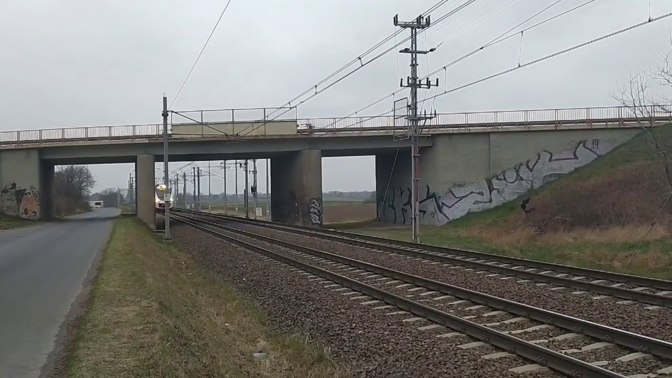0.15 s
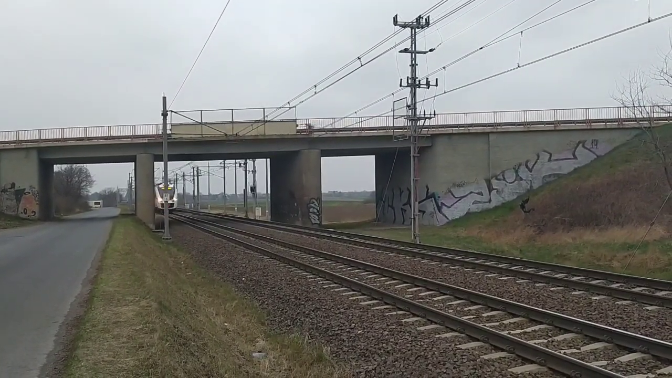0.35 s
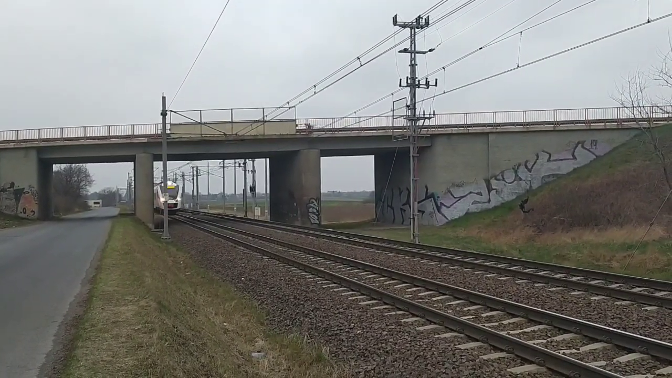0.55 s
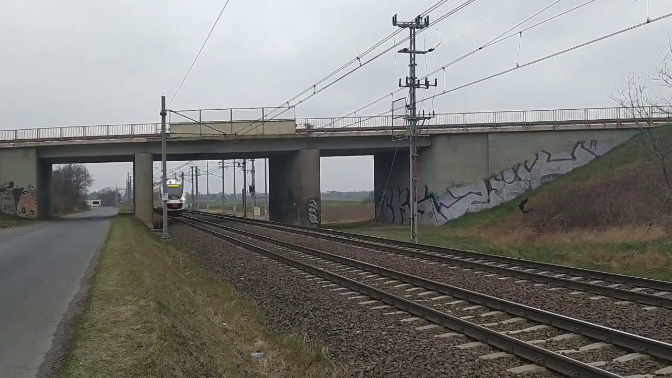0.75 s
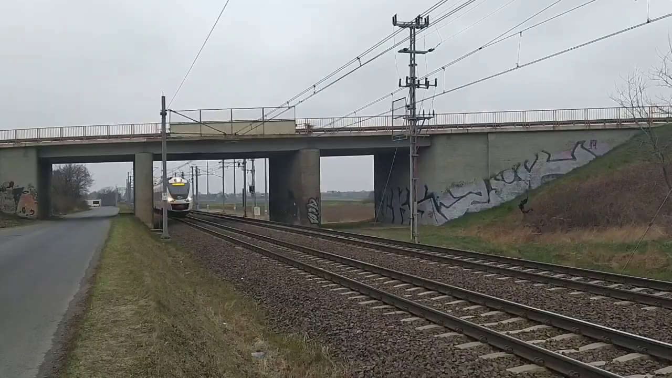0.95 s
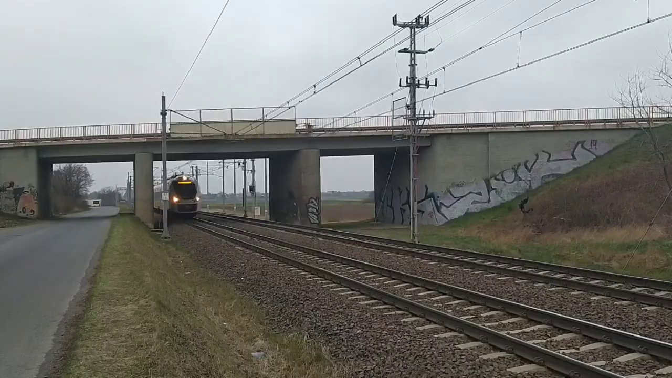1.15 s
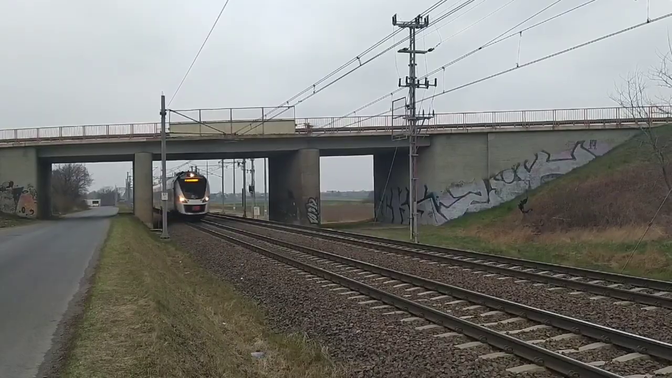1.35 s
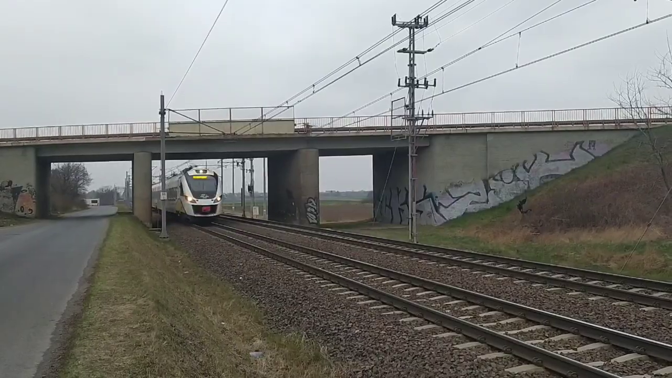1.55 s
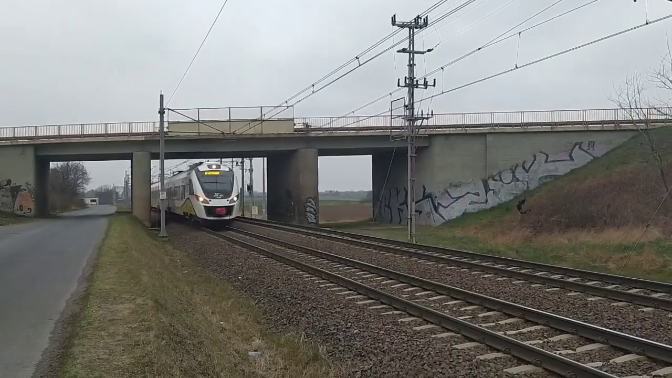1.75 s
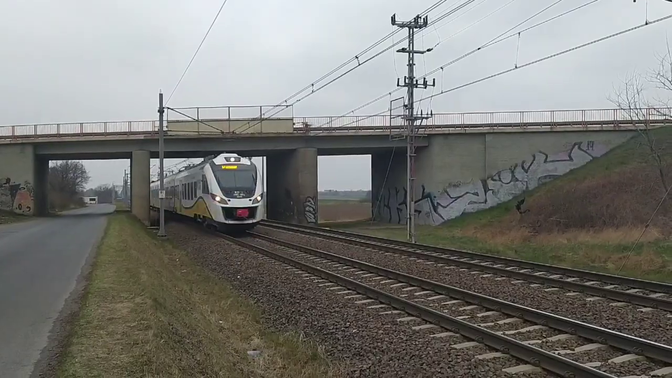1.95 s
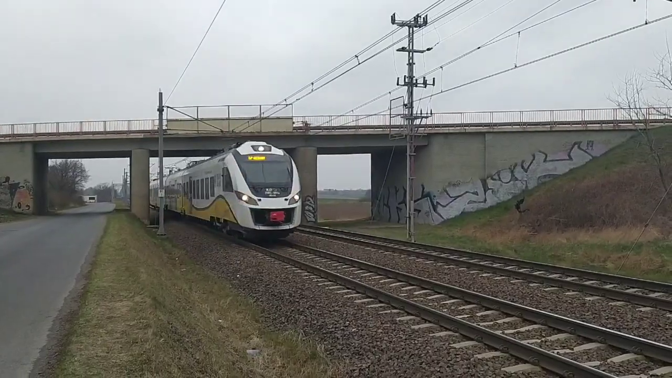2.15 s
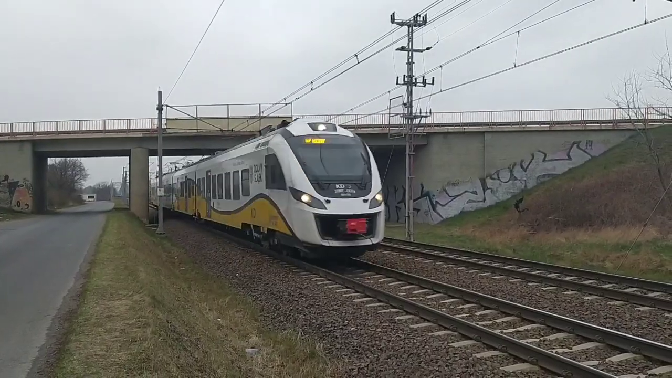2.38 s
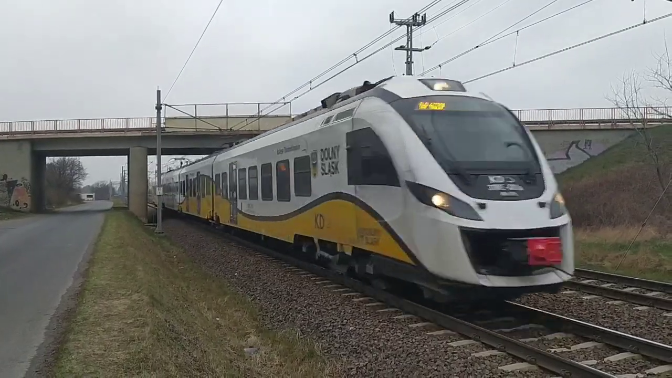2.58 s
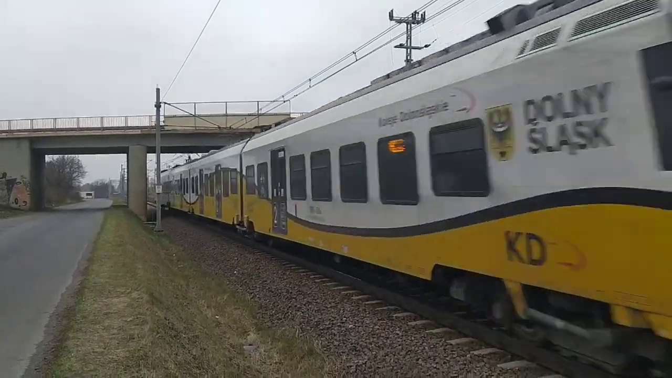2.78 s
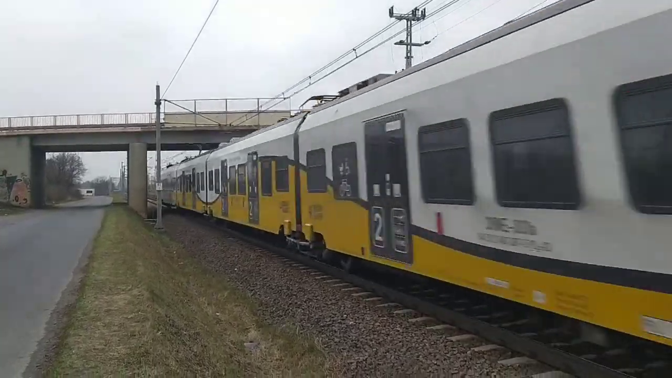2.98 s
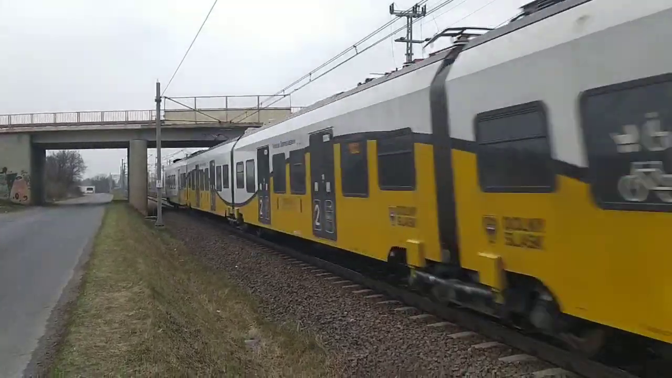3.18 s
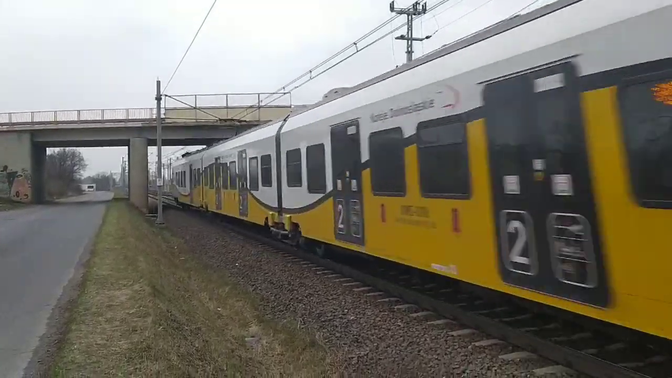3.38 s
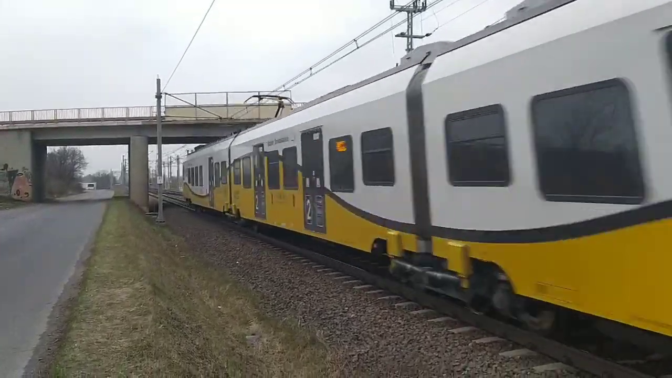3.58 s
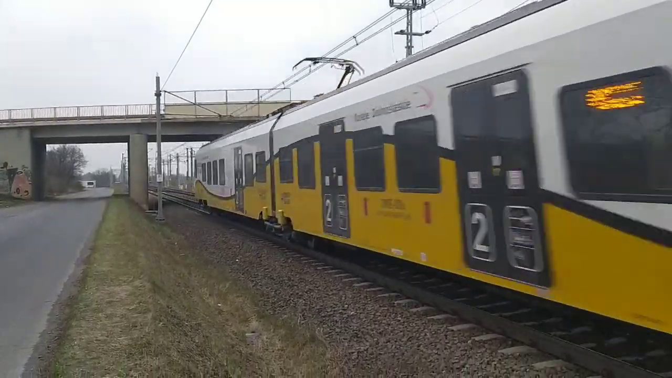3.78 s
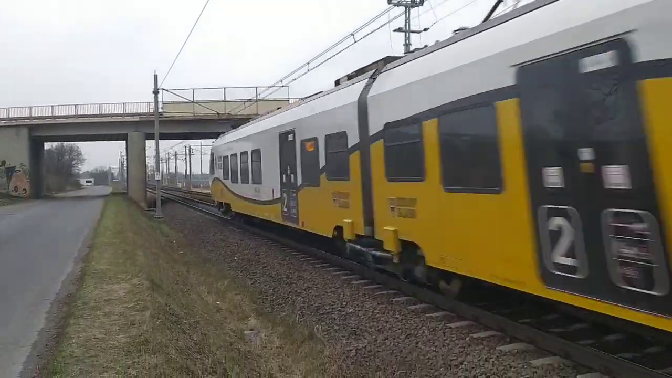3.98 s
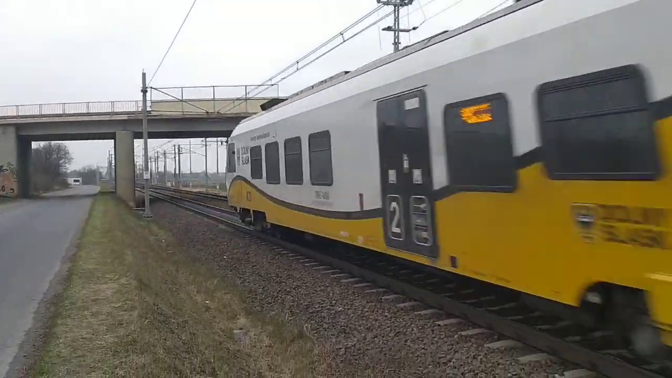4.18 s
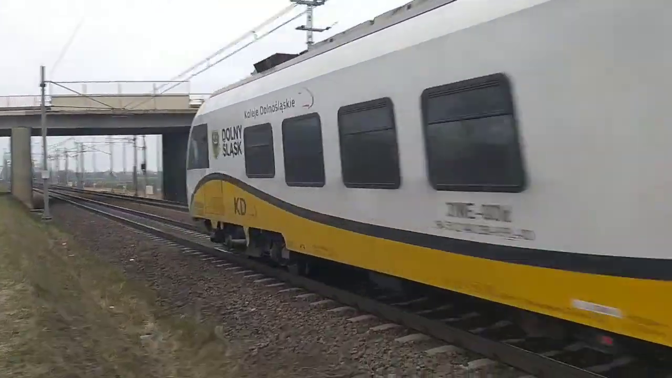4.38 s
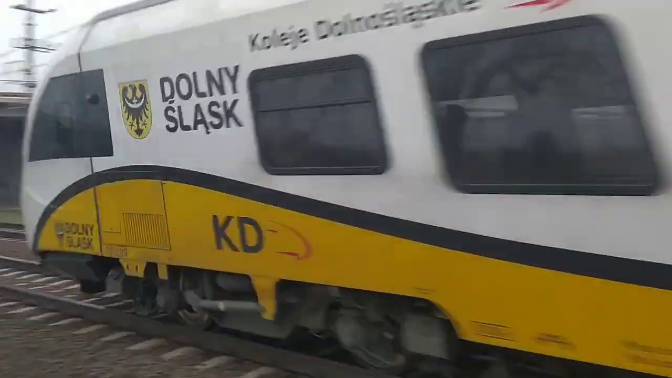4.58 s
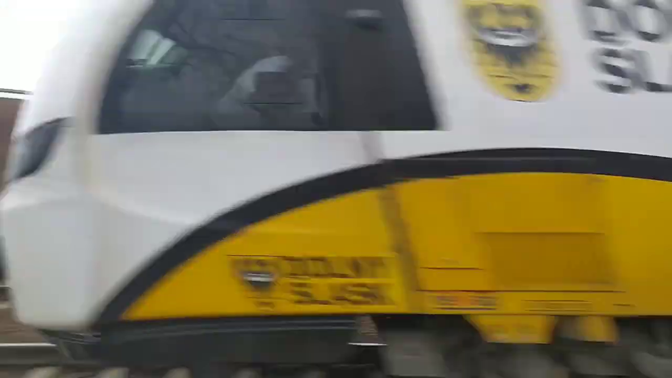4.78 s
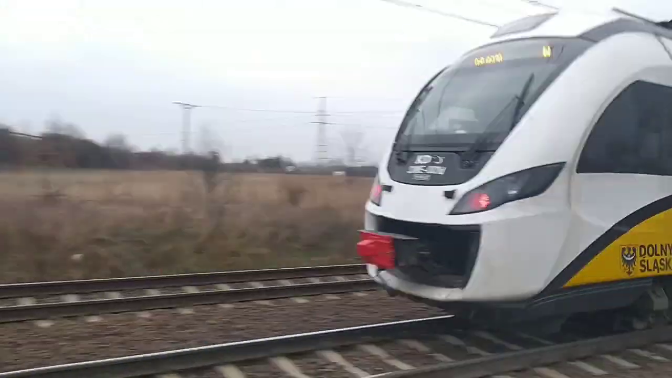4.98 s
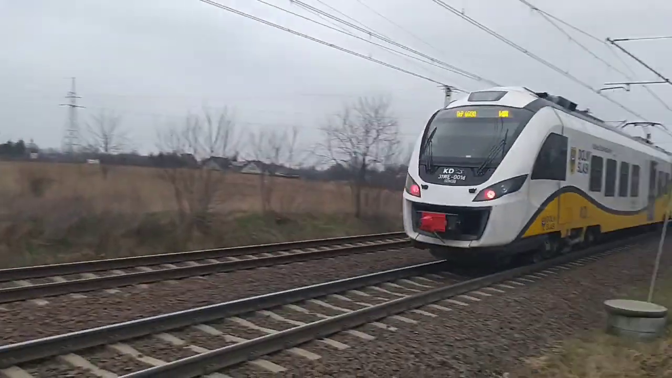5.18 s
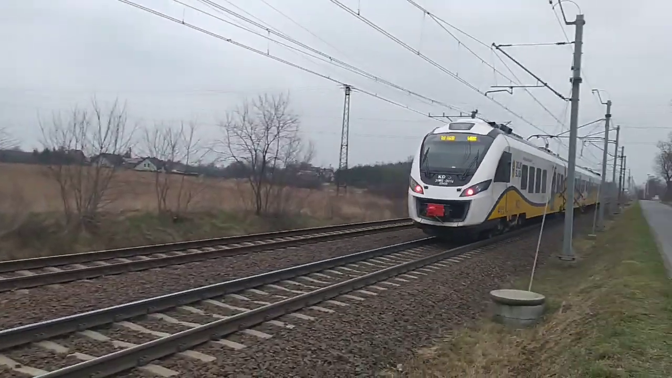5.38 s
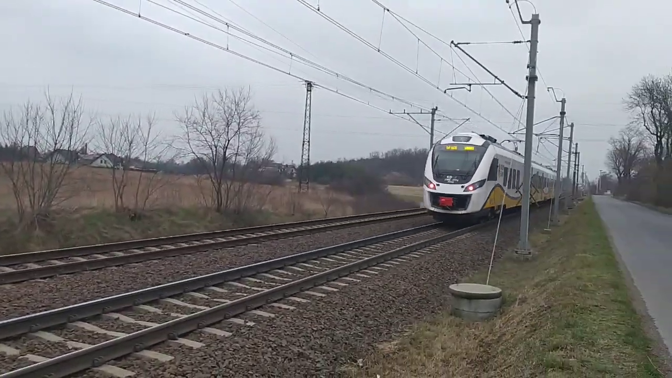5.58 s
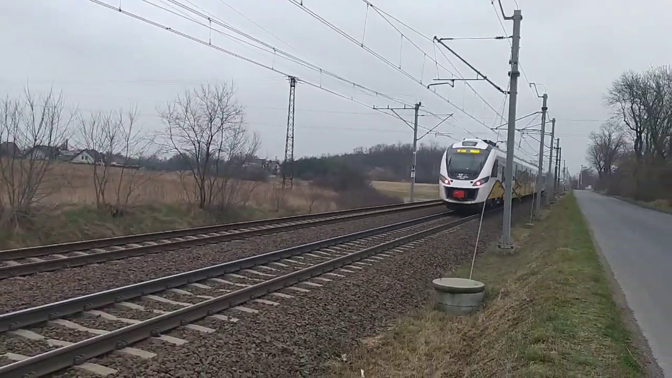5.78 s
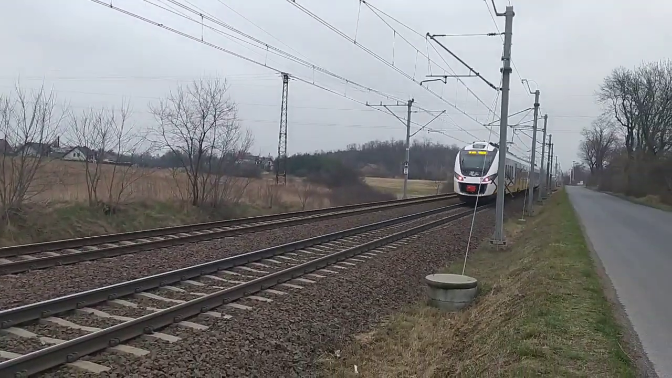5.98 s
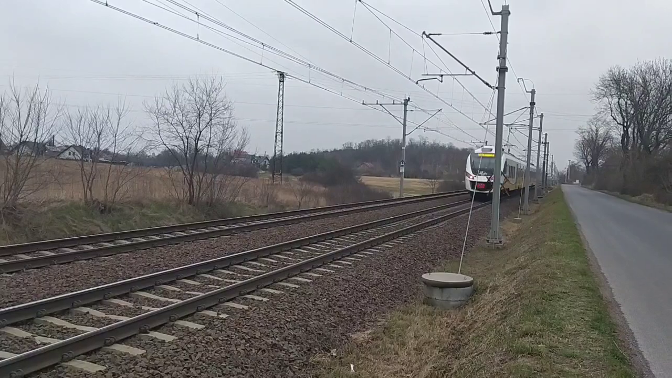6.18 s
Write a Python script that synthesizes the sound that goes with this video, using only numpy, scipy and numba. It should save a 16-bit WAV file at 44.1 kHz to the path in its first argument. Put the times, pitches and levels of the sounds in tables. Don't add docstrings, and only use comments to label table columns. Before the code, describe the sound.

A handheld stereo phone close to the track catches a fast electric multiple unit. Thin metallic singing and a soft hiss build, then a broad rush of wheels and air with uneven thumps and a few hard ticks. The last wheels pass with a bright ringing surge, pitch sinks, and the sound fades beneath blunt wind buffeting and dull rattling cracks.

```python
import sys
import numpy as np
from scipy import signal
from scipy.fft import rfft, irfft, dct
from scipy.io import wavfile
from scipy.ndimage import uniform_filter1d
from numba import njit

SR = 44100
rng = np.random.default_rng(int(sys.argv[2]) if len(sys.argv) > 2 else 0)


def output_pcm(signal):
    pcm = np.clip(np.atleast_2d(signal).T, -1, 1) * 32767
    wavfile.write(sys.argv[1], SR, np.round(pcm).astype(np.int16))


def gain_from_db(level_db):
    decades = np.asarray(level_db, float) / 20
    return 10 ** decades


N = 275434
TIME = np.arange(N) / SR
FREQ = np.fft.rfftfreq(N, 1 / SR) + 1
SPEED_M_S = 33


def unit(x):
    return x / np.sqrt(np.mean(x ** 2))


def curves(table):
    s, *columns = np.transpose(table)
    return [np.interp(TIME, s, c) for c in columns]


def bump(s, length):
    return np.exp(-((TIME - s) / length) ** 2)


def walk(rate):
    k = int(SR / rate)
    held = np.repeat(rng.standard_normal(N // k + 1), k)
    slewed = uniform_filter1d(uniform_filter1d(held, k), k)
    return unit(slewed[:N])


@njit
def svf(x, hz, width):
    y, b, l = np.empty(len(x)), 0., 0.
    for i in range(len(x)):
        g, k = np.tan(np.pi * hz[i] / SR), width / hz[i]
        v = (b + g * (x[i] - l)) / (1 + g * (g + k))
        b, l, y[i] = 2 * v - b, l + 2 * g * v, k * v
    return y


def gusts(table, trim_db):
    out, age = np.zeros(N + 4000), np.arange(4000) / SR
    for (s, db, hz), noise in zip(table, rng.standard_normal((len(table), 2, 4000))):
        length = 0.014 * (200 / hz) ** 0.46
        rise = np.sin(np.pi / 2 * np.clip(age / 0.0073, 0, 1)) ** 2
        shape = rise * np.exp(-(age / length) ** 2)
        wobble = unit(uniform_filter1d(noise[0], size=150))
        glide = hz * (.85 + .4 * np.exp(-age / .008)) * gain_from_db(2.5 * wobble)
        flap = np.sin(2 * np.pi * np.cumsum(glide) / SR)
        swirl_hz = np.full(4000, 1.63 * hz)
        swirl = unit(svf(svf(noise[1], swirl_hz, 1.5 * hz), swirl_hz, 1.9 * hz))
        out[int((s - .003) * SR):][:4000] += gain_from_db(db + trim_db) * shape * (flap + 0.37 * swirl)
    return out[:N]


def rattles():
    # time in seconds, peak in dB, brightness in Hz.
    cracks = [
        (5.909, -24, 696),
        (5.971, -10, 830),
        (5.989, -6, 775),
        (6.0008, -6, 2110),
        (6.017, -15, 1500),
        (6.05, -23, 890),
        (6.129, -34, 804),
        (6.195, -15, 700),
        (6.235, -11, 790),
    ]
    out, age = np.zeros(N + 800), np.arange(800) / SR
    for (s, db, hz), noise in zip(cracks, rng.standard_normal((len(cracks), 800))):
        burst = noise * age * np.exp(-age / 0.0024 * (hz / 900) ** 0.36)
        burst[88] -= 3.9 * abs(burst).max() * (hz / 1900) ** 2
        centre_hz, width_hz = np.full(800, 1. * hz), 0.64 * hz * (hz / 900) ** 0.5
        crack = svf(svf(burst, centre_hz, width_hz), centre_hz, width_hz)
        out[int((s - .002) * SR):][:800] += gain_from_db(db) * crack / abs(crack).max()
    return out[:N]


def wind():
    # time in seconds, peak in dB, pitch in Hz.
    left_gusts = [(.355, -20, 61), (.385, -26, 140), (.568, -29, 90), (1.015, -29, 50), (5.748, -18, 71.6),
                  (5.788, -12, 164), (6.03, -21, 198), (6.067, -5, 250), (6.084, -9, 197), (6.1, -9, 120),
                  (6.115, -13, 129), (6.163, -12, 170), (6.18, -26, 59.6)]
    # time in seconds, peak in dB, pitch in Hz.
    right_gusts = [(0.03, -28.5, 189), (0.083, -31, 169), (0.637, -20.5, 160), (0.929, -28, 190),
                   (1.119, -29, 198), (1.139, -24.5, 168), (1.179, -23, 165), (1.339, -22, 240),
                   (2.15, -24, 245), (5.599, -13, 188), (5.633, -7, 199), (5.654, -15, 168),
                   (5.688, -19, 178), (5.908, -6.5, 310), (5.924, -15, 226), (5.968, -1.5, 316),
                   (5.98, -7, 272), (5.998, -5.5, 309), (6.016, -8, 505), (6.028, -9.5, 366),
                   (6.038, -17, 410), (6.049, -9, 533), (6.061, -21, 190), (6.114, -13, 180),
                   (6.128, -8, 393), (6.144, -12, 240), (6.193, -4, 250), (6.216, -7, 163),
                   (6.226, -6.5, 204), (6.239, -4, 297)]
    left = gusts(left_gusts, trim_db=-3.5)
    right = gusts(right_gusts, trim_db=1.5) + rattles()
    return np.array([left, right])


def clicks():
    # time in seconds, peak in dB, left minus right in dB.
    ticks = [
        (2.3994, -24, 2),
        (2.83, -12, 6),
        (2.865, -10, 12),
        (2.931, -7, 8),
        (3.0036, -17, 9),
        (3.0694, -12, -18),
        (3.105, -19, 5),
        (3.1767, -30, -12),
        (3.264, -51, -5),
        (3.399, -15, -8),
    ]
    out, age = np.zeros((2, N + 800)), np.arange(800) / SR
    centre_hz = np.full(800, 2000.)
    for (s, db, pan_db), noise in zip(ticks, rng.standard_normal((len(ticks), 800))):
        strike = noise * age * np.exp(-age / 0.0023)
        tick = svf(svf(strike, centre_hz, 2200.0), centre_hz, 2200.0)
        sides_db = np.array([[pan_db], [-pan_db]]) / 2
        out[:, int(s * SR):][:, :800] += tick / abs(tick).max() * gain_from_db(db - 4.0 + sides_db)
    return out[:, :N]


def thumps():
    # time in seconds, swell in dB, length in seconds.
    strikes = [(2.4, 2.5, 0.011), (2.52, -2, 0.013), (2.596, 3, 0.031), (2.665, 3.5, 0.012),
               (2.73, 2, 0.037), (2.797, 2, 0.028), (2.813, 0, 0.016), (2.966, 4, 0.014),
               (3.002, 2.5, 0.01), (3.029, 4.5, 0.021), (3.079, 4, 0.028), (3.11, 6, 0.019),
               (3.146, 5, 0.032), (3.186, 4.5, 0.02), (3.237, 2.5, 0.019), (3.264, 4.5, 0.015),
               (3.302, 1, 0.026), (3.314, 1, 0.021), (3.35, 0.5, 0.0093), (3.402, 1, 0.036),
               (3.87, 1, 0.03), (4.247, 0.5, 0.023), (4.334, 1.5, 0.035), (4.463, 0, 0.022),
               (4.764, -1.5, 0.021), (4.879, 1.5, 0.022), (4.978, 1, 0.0097), (5.12, 0.5, .015),
               (5.163, 2, 0.023)]
    swell = np.zeros(N)
    for s, db, length in strikes:
        here = slice(int(s * SR) - 400, int(s * SR) + 3600)
        age = np.clip(TIME[here] - s + 0.0084, 0, 1) / length
        swell[here] += db * 5 * age * np.exp(1 - 5 * age + 2.45 * np.minimum(age, 1))
    return swell


def ringing(hz, width_hz):
    return unit(svf(svf(rng.standard_normal(N), hz, width_hz), hz, width_hz))


def rings(table, width_hz):
    distance_m, sound_m_s = 16, 343
    out = 0
    for passes, hz, loudest, db, length in table:
        along = SPEED_M_S * (TIME - passes)
        heard_hz = hz / (1 + SPEED_M_S / sound_m_s * along / np.hypot(along, distance_m))
        out = out + gain_from_db(db) * bump(loudest, length) * ringing(heard_hz, width_hz)
    return out


def rail_rings():
    # passes in seconds, pitch at rest in Hz, loudest in seconds, share in dB, length in seconds.
    songs = [
        (2.7, 1010, 2.14, -4, 0.61),
        (2.71, 993, 2.8, -1.5, 0.18),
        (4.705, 1017, 4.677, 5.5, 0.22),
        (4.66, 1040, 5.15, 0, 0.39),
        (3.9, 1200, 4.72, -4, 0.17),
    ]
    return gain_from_db(np.array([[2.1], [-2.6]])) * rings(songs, width_hz=106.0)


def rim_rings():
    # passes in seconds, pitch at rest in Hz, loudest in seconds, share in dB, length in seconds.
    songs = [
        (2.9, 1820, 2.2, -8, 0.51),
        (2.9, 2000, 3.14, -3, 0.15),
        (4.4, 2265, 4.7, -3.5, 0.34),
        (4.3, 2020, 4.94, -1, 0.089),
        (3.4, 2200, 3.42, -6, 0.056),
    ]
    return gain_from_db(np.array([[-.6], [.6]])) * rings(songs, width_hz=260.0)


def roughness(grain_db, per_s, share):
    size_db = grain_db * np.minimum(rng.exponential(size=(2, N)), 3)
    falls = rng.random((2, N)) < per_s / SR
    grains = falls * gain_from_db(size_db) * rng.standard_normal((2, N))
    return rfft(rng.standard_normal((2, N)) + share * unit(grains))


def ports(colour, excite):
    hz, *columns = np.transpose(colour)
    left_db, right_db, like = (np.interp(np.log(FREQ), np.log(hz), c) for c in columns)
    like = np.clip(like, -.98, .98)
    mid, side = np.sqrt(1 + like) * excite[0], np.sqrt(1 - like) * excite[1]
    return np.array([gain_from_db(left_db) * (mid + side), gain_from_db(right_db) * (mid - side)])


def part(spectra, index):
    edges_hz = (0, 130, 600, 1500, 3650, 22050)
    lo, hi = edges_hz[index], edges_hz[index + 1]
    shape = 1 / np.sqrt((1 + (lo / FREQ) ** 16) * (1 + (FREQ / hi) ** 16))
    both = irfft(spectra * shape, N)
    return both / np.sqrt(np.mean(both.mean(axis=0) ** 2))


def views():
    # time in seconds, where the train is (0 far, 1 coming, 2 alongside, 3 leaving).
    place = [
        (0, 0),
        (.6, 0.32),
        (1.3, 1),
        (2.2, 1.16),
        (2.7, 2),
        (4.8, 2),
        (5.12, 3),
        (6.25, 3),
    ]
    # pitch in Hz, left port in dB, right port in dB, likeness of the ports from -1 to 1.
    roll_far = [(30.2, 0.5, -3, 0.72), (140, -18, -12.5, 0.88), (214, -7.5, -12.5, 0.91),
                (340, -17.5, -24.5, 0.83), (574, -28, -28, 0.69), (795, -10, -15.5, 0.74),
                (1100, -5.5, -16, 0.6), (1220, -31, -6, 0.25), (1390, -9.5, -18, -0.89),
                (1610, -26.5, -25.5, -0.94), (2000, -27, -19.5, 0.015), (2410, -25, -32, 0.1),
                (3140, -36, -33.5, 0.54), (3596, -43, -43, -0.69)]
    roll_coming = [(33, -9.5, -11.5, 0.89), (120, -19.5, -30.5, 0.98), (180, -1, -2.5, 0.72),
                   (254, -6.5, -9.5, 0.98), (384, -10.5, -19.5, 0.11), (576, -20.5, -17, 0.56),
                   (792, 4.5, -1.5, 0.6), (1105, 5, -1.5, 0.41), (1422, -13.5, -11.5, -0.42),
                   (1686, -13.5, -19, -1.3), (1935, -16.5, -12.5, 0.54), (2650, -20.5, -21, -0.2),
                   (3210, -20, -19.5, 0.79), (3720, -51.5, -54, 0.53)]
    roll_beside = [(33.6, -11, -16.5, 1), (120, -18.5, -19.5, 0.75), (180, -0.5, -5, 0.97),
                   (240, 1, -2.5, 0.82), (390, -4.5, -9, 0.94), (601, -8.5, -11, 0.57),
                   (792, 1, -2.5, 0.94), (1034, 2, -1, 0.45), (1241, -11, -8, 0.029),
                   (1465, -10, -11, -0.59), (1860, -15.5, -11.5, -0.29), (2322, -11, -10, 0.76),
                   (3003, -17.5, -18, -0.2), (3170, -26, -17.5, 0.053)]
    roll_leaving = [(29.7, -17.5, -12.5, 0.62), (120, -22, -24, 0.39), (188, 5.5, 1, 0.95),
                    (420, 1, -3.5, 0.69), (620, -18, -16, 0.63), (897, -7.5, -6.5, .7),
                    (1000, -2, -10.5, -0.35), (1226, -8, -23, -0.11), (1262, -0.5, -19, 0.053),
                    (1500, -18, -15.5, 0.15), (1750, -7.5, -11.5, 0.0086), (2430, -9.5, -11, 0.42),
                    (3220, -18.5, -20.5, 0.14), (3450, -25.5, -16.5, -0.63)]
    # pitch in Hz, left port in dB, right port in dB, likeness of the ports from -1 to 1.
    air_far = [(3700, -21.5, -26, -0.3), (5470, -31, -22, 0.3), (5860, -6, -11, -0.29),
               (5900, -23, -28, -0.4), (6450, -29, -26, 0.9), (6610, -5, -4, 1), (7120, -4, 1.5, 1.0),
               (8000, -26, -27, 0.8), (9150, -17, -2, 0.72), (11400, -21, -22, 0.6), (12280, -30, -31, 1.0),
               (13270, -24, -23, 0.8), (14800, -39, -43, -0.3)]
    air_coming = [(3580, -11.5, -11, -0.31), (3900, -16.5, -8.5, -0.45), (5030, -19, -12.5, 0.34),
                  (4930, -16, -9.5, 1), (6220, -10.5, -3, -0.24), (6220, -19, -37, 0.8),
                  (6650, -4.5, -0.5, 1), (7600, -7.5, -5, 0.74), (9100, -12, 1, 0.93),
                  (11160, -17, -17.5, 1), (12700, -25, -26, 0.47), (14200, -32, -32, 0.5),
                  (14800, -36, -50, 0.0)]
    air_beside = [(3590, -3, -17.5, -1.5), (4270, -13, -6, 0.25), (5190, -3, -1.5, -0.17),
                  (7580, -7, -2.5, 1), (8770, -4.5, 3, 0.82), (9600, -8, -0.5, 0.53),
                  (10700, -17, -14, 0.82), (11880, -21, -18, 0.83), (12830, -24, -26.5, 0.096),
                  (15000, -36.5, -34.5, 1)]
    air_leaving = [(3600, -13, -18, 0.12), (4780, -17, -13, 0.47), (5400, -5, -5, -0.3),
                   (5450, -12.5, -8.5, -0.44), (6300, -11.5, -11, 0.27), (8900, -6, 0, 0.85),
                   (9350, -14.5, -0.5, 0.99), (9800, -8, -14, 1), (10280, -14.5, -14, 0.64),
                   (11840, -21.5, -21.5, 0.21), (15100, -29, -28, 0.61)]
    where, = curves(place)
    rolls = (roll_far, roll_coming, roll_beside, roll_leaving)
    airs = (air_far, air_coming, air_beside, air_leaving)
    ranges = np.zeros((5, 2, N))
    for view, (roll, air) in enumerate(zip(rolls, airs)):
        excite = roughness(grain_db=2.5, per_s=3000, share=.3)
        share = np.sqrt(np.clip(1 - abs(where - view), 0, 1))
        rolling = ports(roll, excite)
        for k in range(4):
            ranges[k] += share * part(rolling, index=k)
        ranges[4] += share * part(ports(air, excite), index=4)
    return ranges


def breeze():
    # time in seconds, level in dB.
    strength = [(0, -42.5), (.5, -48), (.6, -37), (.85, -41.5), (1.2, -37.5), (2.2, -32.5), (2.5, -29),
                (2.83, -20), (2.92, -26.5), (3.77, -32), (4.71, -30), (5.51, -37), (5.74, -31.5),
                (5.92, -41), (5.98, -30.5), (6.25, -26.5)]
    return curves(strength)


def passing():
    # passes in seconds, then body rumble, rails, wheels and air hiss in dB.
    bogies = [
        (2.862, -16, -18.5, -20, -23.5),
        (3.402, -20.5, -22, -19.5, -22),
        (3.881, -25, -20.5, -21.5, -24),
        (4.301, -20, -23, -19.5, -23),
        (4.787, -20, -21.5, -19.5, -17.5),
    ]
    # delay in seconds, distance in metres, fading while coming and while leaving (exponents),
    # gain under the bridge in dB.
    carry = [
        (0.039, 5.26, 1.27, 1.26, 1.5),
        (-0.07, 8.26, 1.43, 1, 1),
        (0.0032, 7.76, 1.753, 1.91, 6),
        (-0.023, 9.18, 1.454, 1.425, 1.7),
    ]
    # time in seconds, bass in dB, treble in dB, length in seconds.
    ducks = [
        (1.02, 3.5, -1.5, 0.13),
        (1.256, 1, -2.5, 0.13),
        (1.467, 1, -0.5, 0.15),
        (2.62, -0.5, -1.5, 0.14),
        (3.132, -3, 0, .012),
        (2.996, -1, 1.5, 0.11),
        (3.15, -2.5, -5.5, 0.12),
        (3.69, -0.5, -2, 0.057),
        (5.042, -0.5, -0.5, 0.094),
        (6.044, 2.5, -5.5, 0.051),
    ]
    duck_shares = (.01, .15, .6, .99)
    bridge = bump(1.37, length=0.63)
    bass_db, treble_db = sum(np.outer(db, bump(s, length)) for s, *db, length in ducks)
    passes, *peaks = np.transpose(bogies)[:, :, None]
    levels = []
    for peak_db, (delay, metres, coming, leaving, bridge_db), share in zip(peaks, carry, duck_shares):
        along = SPEED_M_S * (TIME - passes - delay)
        fading = np.where(along < 0, coming, leaving)
        power = gain_from_db(2 * peak_db) / (1 + (along / metres) ** 2) ** fading
        sway_db = share * treble_db + (1 - share) * bass_db
        levels.append(10 * np.log10(power.sum(axis=0)) + bridge_db * bridge + sway_db)
    return levels


def train():
    levels = [*breeze(), *passing()]
    ranges = views()
    ranges[2] += rail_rings()
    ranges[3] += rim_rings()
    shared, swell = walk(25), thumps()
    common_db, own_db = (.2, .5, .5, .4, .3), (.4, .9, .8, .8, .7)
    thump, trim_db = (.3, 1.01, .8, .4, .15), (1.5, -1.0, -2.0, -2.0, 0.77)
    out = 0
    for k in range(5):
        flicker_db = common_db[k] * shared + own_db[k] * walk(22.126)
        out = out + ranges[k] * gain_from_db(levels[k] + trim_db[k] + flicker_db + thump[k] * swell)
    return out * gain_from_db(np.array([[0.5], [-0.5]]) / 2)


def scene():
    return wind() + clicks() + train()


def unmasked(spec, scatter_db):
    # pitch in Hz, how far under its loud neighbours a faint partial survives in dB.
    survives = [(1000, 30), (1600, 14), (2500, 13), (3300, 7), (3900, 2), (4600, 6.5), (6200, 4.5),
                (8000, 9.5), (9600, 12), (10500, 5), (11500, -1), (13000, -5), (14800, -6.5)]
    power = uniform_filter1d(spec ** 2 + np.mean(spec ** 2, axis=0), size=2, axis=1)
    patches = unit(uniform_filter1d(rng.standard_normal((spec.shape[1], 128)), size=3, axis=0))
    margin_db = np.interp(np.arange(1024) * SR / 2048, *np.transpose(survives))
    floor_db = scatter_db * np.repeat(patches, 8, axis=1) - margin_db
    near, around = uniform_filter1d(power, size=4, axis=2), uniform_filter1d(power, size=141, axis=2)
    return near > around * gain_from_db(2 * floor_db)


def starve(x, band_db, frame_db, paired):
    # pitch in Hz, step against the frame's level in dB.
    steps = [(300, -17), (1000, -13), (1500, -11), (2200, -10), (3000, -9), (4000, -9.5), (6000, -9.5),
             (8000, -10), (9300, -11), (10300, -10), (11500, -14), (13000, -20), (14500, -25), (15000, 9)]
    hop, lead = 1024, 1089
    window = np.sin(np.pi * (np.arange(2 * hop) + .5) / 2 / hop)
    padded = np.pad(x, ((0, 0), (lead, 3 * hop)))
    starts = np.arange(0, padded.shape[1] - 2 * hop, hop)
    frames = padded[:, starts[:, None] + np.arange(2 * hop)] * window
    a, b, c, d = np.split(frames, 4, axis=2)
    spec = dct(np.dstack([-c[..., ::-1] - d, a - b[..., ::-1]]), type=4, norm="ortho")
    chance = rng.standard_normal((len(starts), 66))

    def pair(s):
        sum_difference = np.array([s[0] + s[1], s[0] - s[1]]) / np.sqrt(2)
        return np.where(chance[:, :1] < paired, sum_difference, s)

    spec = pair(spec * unmasked(spec, scatter_db=4.5))
    level = np.sqrt(np.mean(spec[:, :, 64:480] ** 2, axis=(0, 2)))[:, None] + 1e-9
    bands_db = np.interp((np.arange(64) + .5) * SR / 128, *np.transpose(steps))
    step_db = bands_db + frame_db * chance[:, 1:2] + band_db * chance[:, 2:]
    step = level * np.repeat(gain_from_db(step_db), 16, axis=1)
    spec = np.sign(spec) * np.floor((abs(spec) / step) ** .75 + .4054) ** (4 / 3) * step
    p, q = np.split(dct(pair(spec), type=4, norm="ortho"), 2, axis=2)
    frames = np.dstack([q, -q[..., ::-1], -p[..., ::-1], -p]) * window
    out = frames[:, 1:, :hop] + frames[:, :-1, hop:]
    return out.reshape(2, -1)[:, lead - hop:][:, :N]


def band_limit(x):
    return signal.sosfilt(signal.butter(12, 14800, fs=SR, output="sos"), x)


def record(dry):
    rounded = .97 * np.tanh(dry / .97)
    kept = starve(rounded, band_db=2.5, frame_db=2.0, paired=-.4)
    return band_limit(kept)


dry = scene()
out = record(dry)
output_pcm(out)
```